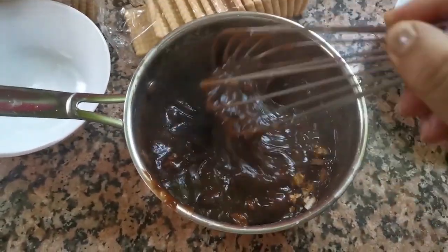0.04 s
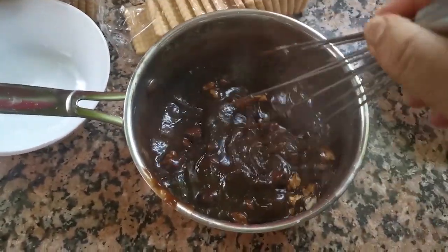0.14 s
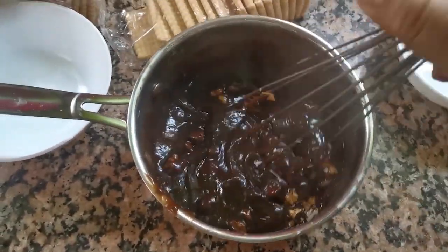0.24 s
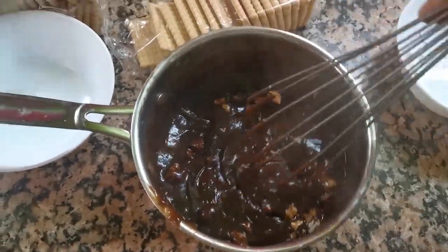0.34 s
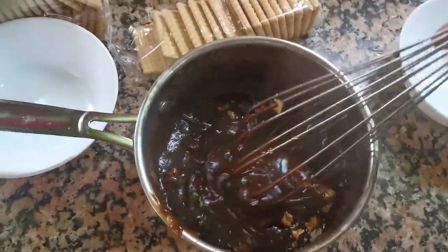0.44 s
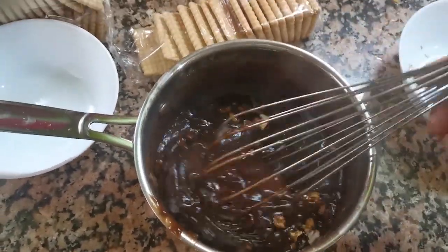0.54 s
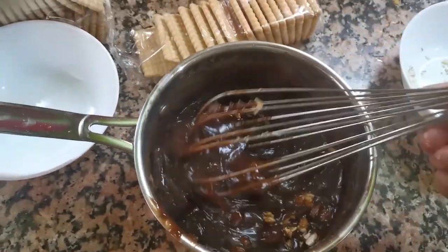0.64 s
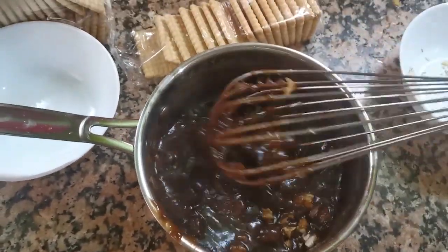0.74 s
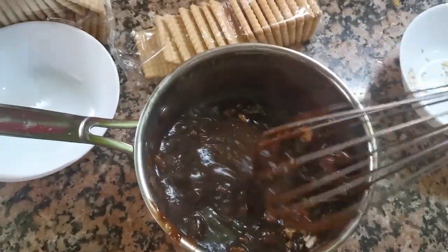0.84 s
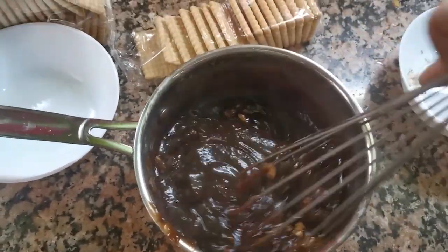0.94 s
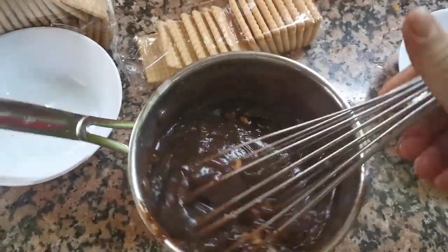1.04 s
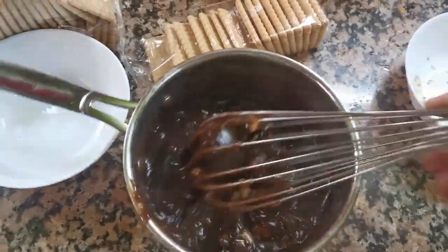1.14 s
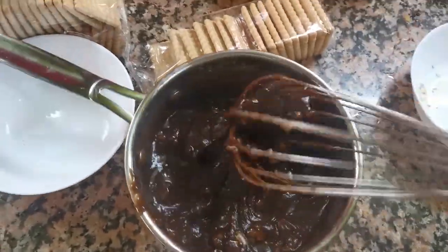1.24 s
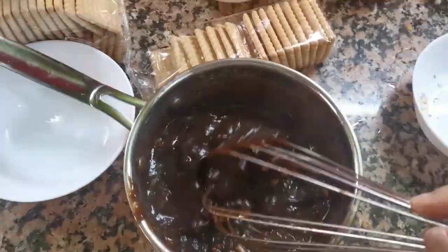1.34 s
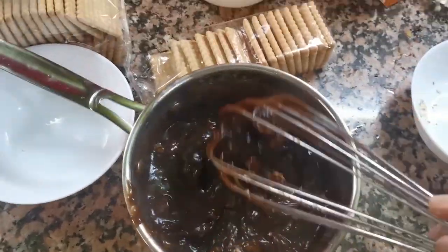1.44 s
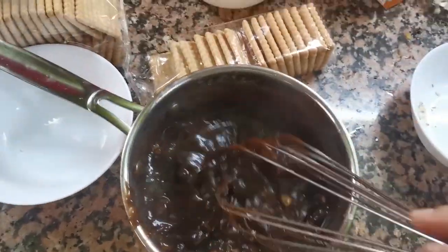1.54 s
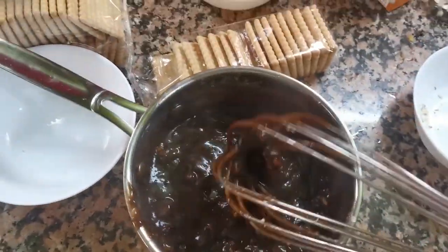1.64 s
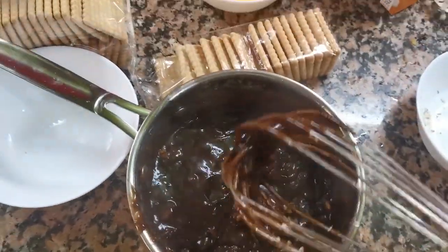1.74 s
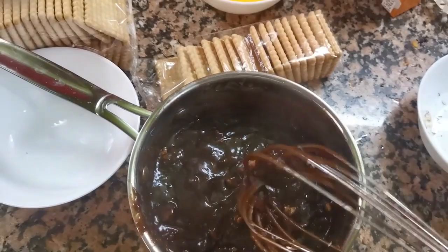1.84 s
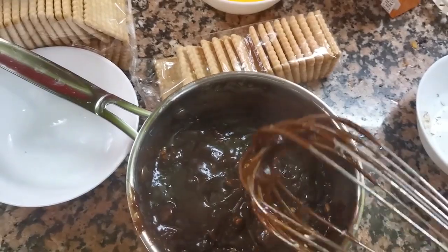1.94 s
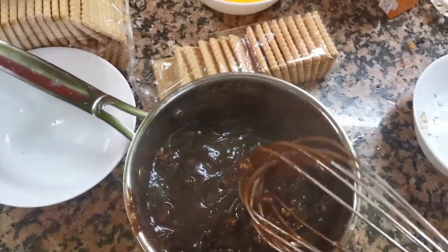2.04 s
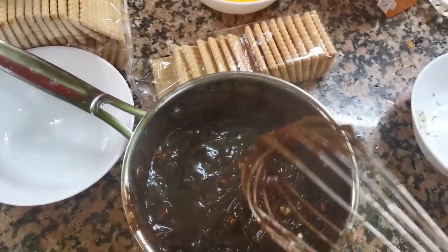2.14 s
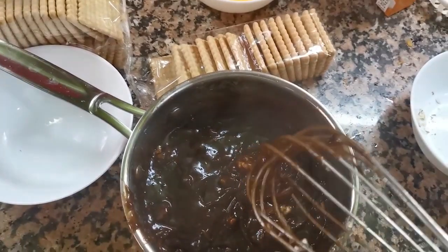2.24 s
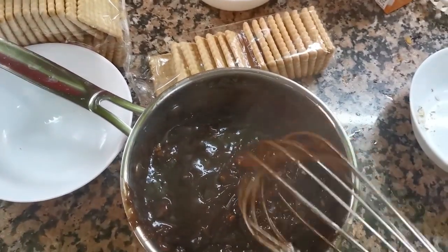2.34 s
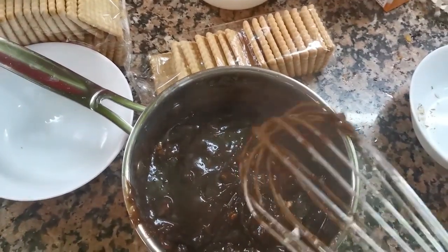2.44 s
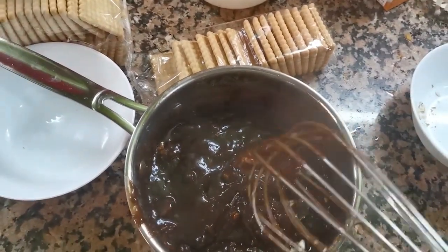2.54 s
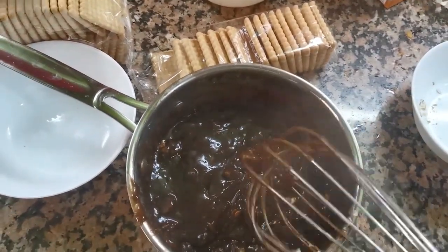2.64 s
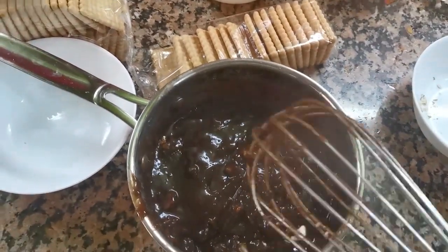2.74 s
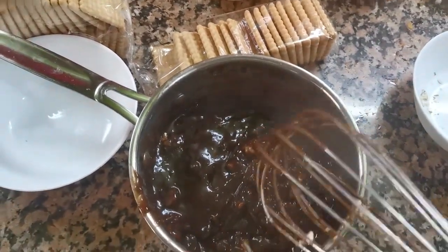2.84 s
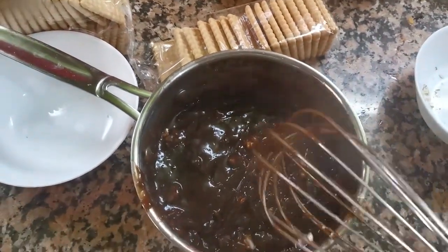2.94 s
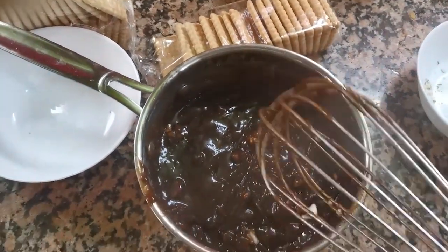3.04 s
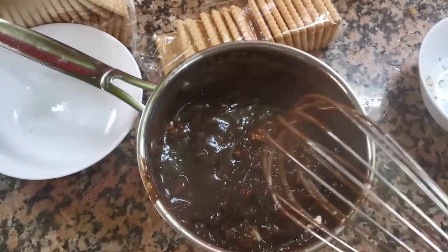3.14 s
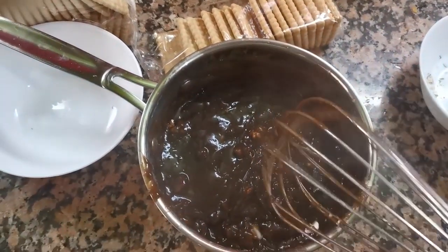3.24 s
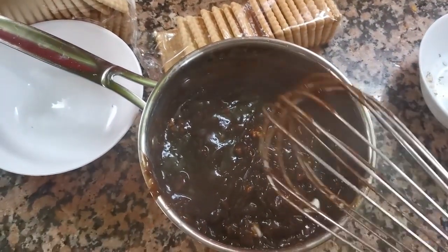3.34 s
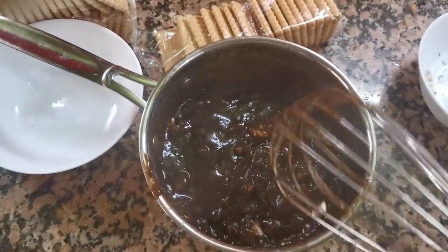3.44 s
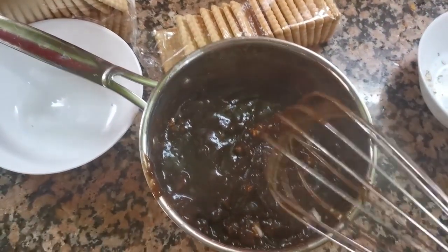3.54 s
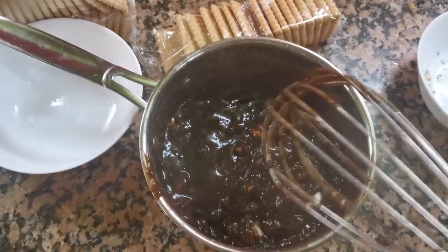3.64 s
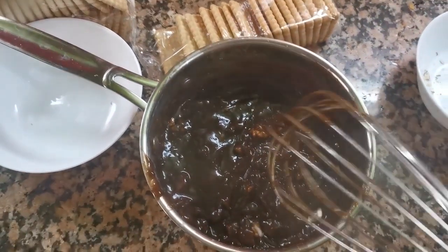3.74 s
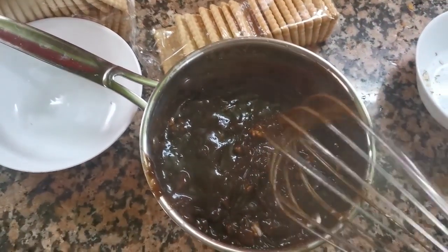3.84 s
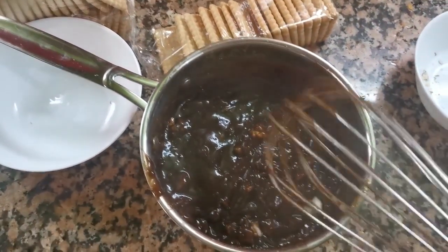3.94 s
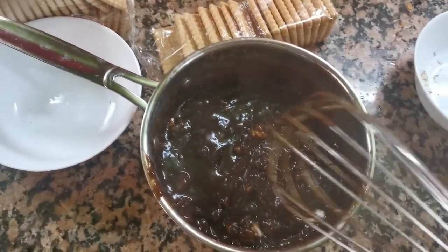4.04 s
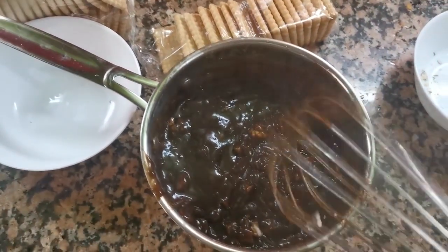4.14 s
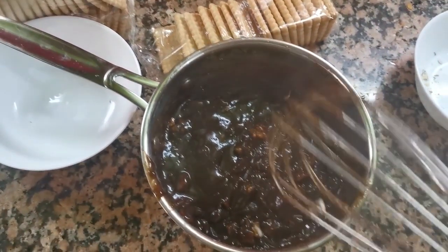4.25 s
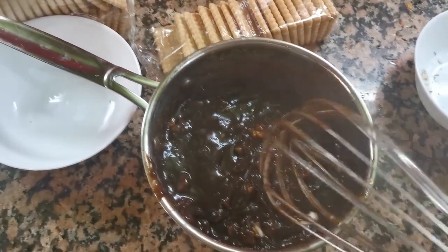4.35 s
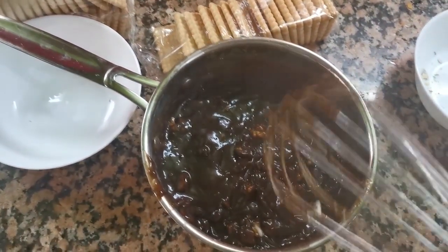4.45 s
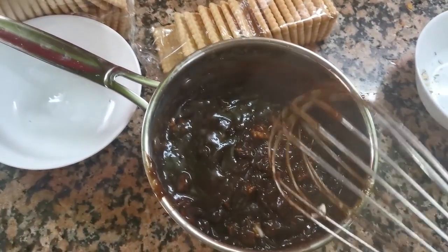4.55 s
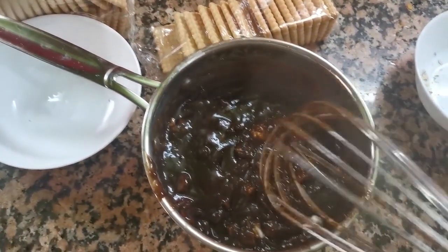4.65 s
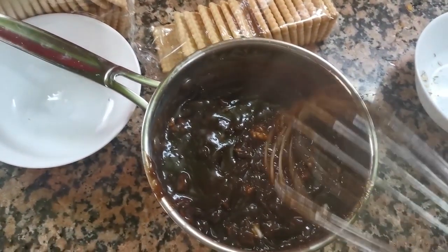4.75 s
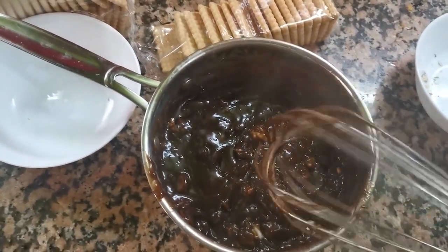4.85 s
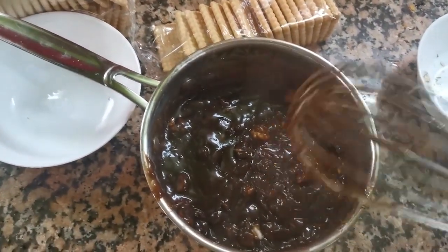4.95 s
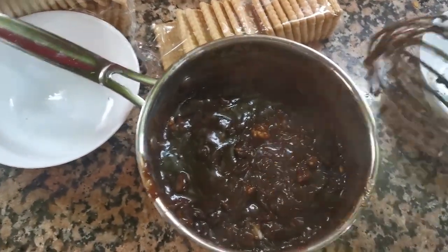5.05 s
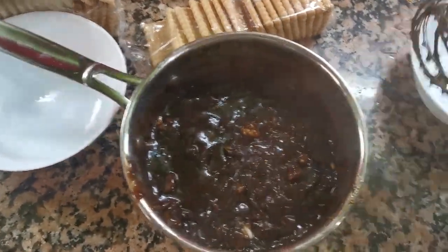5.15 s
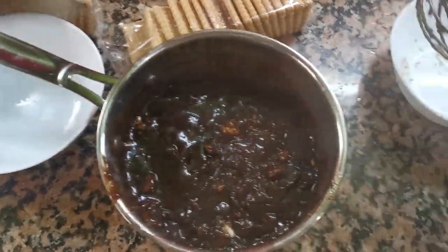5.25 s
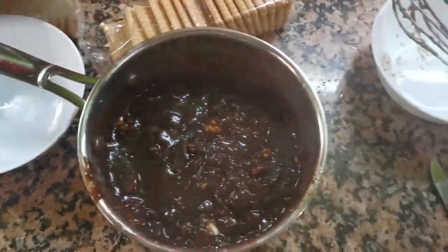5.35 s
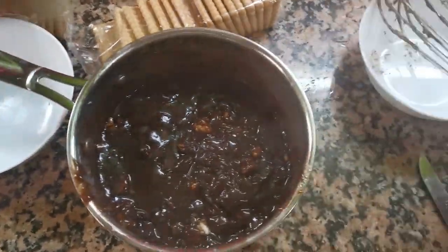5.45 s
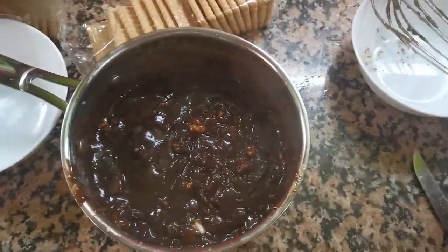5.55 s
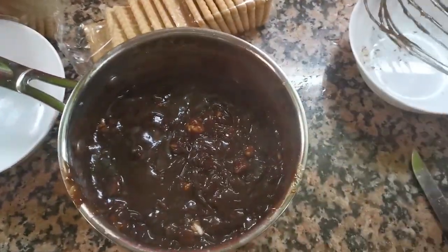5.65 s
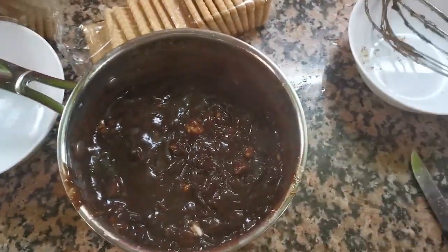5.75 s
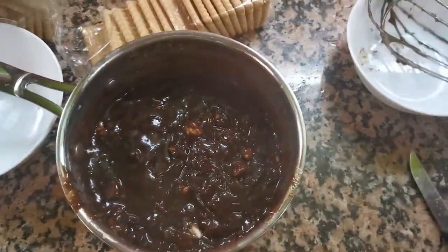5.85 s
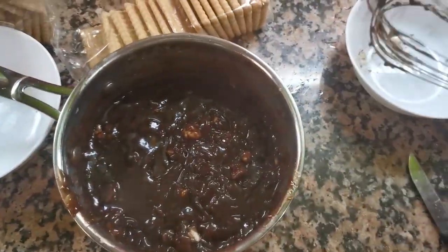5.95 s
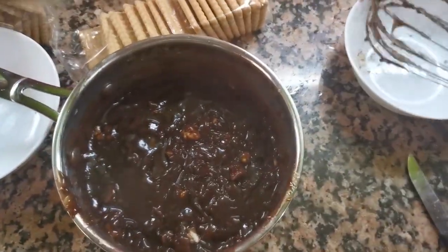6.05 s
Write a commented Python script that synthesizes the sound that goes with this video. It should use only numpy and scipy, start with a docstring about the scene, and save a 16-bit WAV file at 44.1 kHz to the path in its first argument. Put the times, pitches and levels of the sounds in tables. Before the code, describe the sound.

Close up in a small, lively kitchen, a wire whisk stirs thick, crackly mixture in a steel saucepan, with knocks and a brief squeaky scrape. Then twenty even, quick raps on the rim give bright wiry clacks over a dull pan thud. After a short pause the whisk clinks into a china bowl. Low room air and appliance hum lie underneath.

```python
"""A wire whisk loaded with chocolate mixture is rapped twenty times on a steel saucepan's rim: modal ringing and noise.
Before that it stirs the thick mixture and now and then knocks the wall: shaped noise, pops, gliding squeaks and modes.
At the end it is laid clinking into a china bowl, as two sets of damped modes and a buzz.
The small kitchen answers with decaying noise echoes; an appliance hums, in wavering sines, under noisy room air."""
import sys
import numpy as np
from scipy import signal
from scipy.fft import rfft, irfft, next_fast_len
from scipy.io import wavfile
from scipy.ndimage import map_coordinates

SR = 44100
rng = np.random.default_rng(int(sys.argv[2]) if len(sys.argv) > 2 else 0)


def file_out(sig):
    """Save sig as 16-bit WAV at sys.argv[1]."""
    # one column per channel
    cols = np.atleast_2d(sig).T
    # limit, then scale
    lim = np.clip(cols, -1, 1)
    pcm = np.round(lim * 32767).astype(np.int16)
    wavfile.write(sys.argv[1], SR, pcm)


N = 269451

# Modes of the pan struck from inside, low on its wall.
# Each row: frequency in Hz, relative level in dB, decay time t60 in s.
INSIDE_MODES = [(853, -12, 0.15), (1183, -8, 0.044), (1560, -7.5, .025), (1733, -3, 0.025),
                (2120, -12.5, .02), (2560, -5.5, 0.027), (3026, 4, 0.016), (3090, 0.5, 0.021),
                (3240, -5.5, 0.055), (3960, -6, .02), (4340, -7, .025), (4735, 1, 0.037), (5000, 1, 0.034),
                (5235, 6, 0.017), (5940, 0.5, 0.029)]
RIM_PAN_DB, STIR_PAN_DB, BOWL_PAN_DB = 0.5, 2, 1  # left minus right at each place
DRAG_START_S, DRAG_END_S = .3, .56  # one stroke drags along the wall


def amp(db):
    """Level is logarithmic: decibels to amplitude gain."""
    return 10 ** (np.asarray(db) / 20)


def unit(x):
    """Mean power normalisation: scale to rms 1."""
    return x / np.sqrt(np.mean(x ** 2) + 1e-20)


def unit_attack(x):
    """Onset power normalisation: scale a blow so that its first 30 ms have rms 1."""
    onset = x[..., :round(.03 * SR)]
    return x / np.sqrt(np.mean(onset ** 2) + 1e-20)


def along(points, hz, axis=1):
    """Logarithmic frequency scale: read one column of (Hz, ..) points by interpolation."""
    table = np.transpose(points)
    return np.interp(np.log(hz + 1), np.log(table[0] + 1), table[axis])


def curves(rows):
    """Linear interpolation in time: one value per sample for each column after the time."""
    s, *cols = np.transpose(rows)
    return [np.interp(np.arange(N) / SR, s, c) for c in cols]


def wobble(rate):
    """Band-limited fluctuation: a smooth random curve through rate knots a second."""
    knots = rng.standard_normal(int(N * rate / SR) + 4)
    return map_coordinates(knots, [np.arange(N) * rate / SR])


def filtered(x, response):
    """Linear filtering: multiply the spectrum of x by a response of frequency."""
    n = x.shape[-1]
    m = next_fast_len(n + SR // 10)
    spectrum = rfft(x, m) * response(np.fft.rfftfreq(m, 1 / SR))
    return irfft(spectrum, m)[..., :n]


def coloured(x, spectrum):
    """Spectral shaping: x filtered by a (Hz, dB) curve, at rms 1."""
    return unit(filtered(x, lambda hz: amp(along(spectrum, hz))))


def diffuse(pair):
    """Diffuse-field coherence: two unrelated signals become ears alike in the bass, apart in the treble."""
    # Likeness of left and right. Each row: frequency in Hz, correlation from 0 to 1.
    likeness = [(100, 0.95), (500, 0.95), (1200, 0.93), (2500, 0.6), (7000, 0.072)]

    def mid_side_gains(hz):
        turn = np.arccos(np.clip(along(likeness, hz), -1, 1)) / 2
        return np.array([np.cos(turn), np.sin(turn)])

    mid, side = filtered(pair, mid_side_gains)
    return np.array([mid + side, mid - side])


def add(track, s, sound):
    """Superposition: mix a sound into the track at time s."""
    part = track[:, max(round(s * SR), 0):][:, :sound.shape[-1]]
    part += sound[..., :part.shape[-1]]


def ring(modes, t, scatter_db, detune, spread):
    """Modal synthesis: decaying sines with new strengths, tuning and phase between the ears for each blow."""
    hz, db, t60 = np.transpose(modes)[:, :, None]
    size, shift, lag, start = rng.standard_normal((4, len(modes), 1))
    fade = amp(db + scatter_db * size - 60 * t / t60)
    phase = 2 * np.pi * (hz * (1 + detune * shift) * t + start)
    # each mode takes about one cycle to start
    onset = 1 - np.exp(-(t * hz) ** 2)
    return np.array([np.sum(onset * fade * np.sin(phase + ear * spread * lag), 0) for ear in (-1, 1)])


def chatter(t, rebound, rebound_db, cluster_s, rattle_db, rattle_t60, count=40):
    """Impulsive contact force: the loops land one after another, rebound once, and rattle as they die out."""
    force = np.zeros(len(t))
    for s, db in ((0, 0), (rebound, rebound_db)):
        later = np.array([0, 1, 2, 3, 4.5]) * cluster_s * rng.uniform(.75, 1.25, 5)
        landing = (abs(s + later) * SR).astype(int)
        np.add.at(force, landing, amp(db - 2.2 * np.arange(5)))
    late = rng.uniform(0, .05, count)
    rattle = amp(rattle_db - 60 * late / rattle_t60) * rng.standard_normal(count)
    np.add.at(force, (late * SR).astype(int), rattle)
    return force


def driven(force, response):
    """Convolution principle: a body's response to a force."""
    return signal.fftconvolve(np.atleast_2d(response), force[None], axes=1)[:, :len(force)]


def in_kitchen(sound):
    """Reverberation: add the room's diffuse answer, with its own level and decay at each frequency."""
    # Each row: frequency in Hz, reverberation time t60 in s, relative echo level in dB.
    room = [(98, 0.95, -5), (296, 0.25, 3), (530, 0.44, -1), (1200, 0.54, 0), (3000, 0.68, -5.5),
            (6850, 0.44, -1.5), (7870, 0.55, -10.5), (10400, 0.37, -8), (15000, 0.17, -5.5)]
    noise = diffuse(rng.standard_normal((2, SR * 2 // 3)))
    hz, t, z = signal.stft(noise, SR, nperseg=256)
    t60 = along(room, hz)[:, None]
    gain = amp(along(room, hz, axis=2))[:, None]
    # a longer decay starts lower, so that its energy does not grow with t60
    level = gain * np.sqrt(np.log(10 ** 6) / (t60 * SR))
    build_up = 1 - np.exp(-t / .006)
    shape = level * amp(-60 * t / t60) * build_up
    response = signal.istft(z * shape, SR, nperseg=256)[1]
    echo = signal.fftconvolve(sound, response, axes=1)
    add(echo, 0, sound)
    return echo


def panned(sound, db):
    """Interaural level difference: place a sound by left minus right in dB."""
    return sound * amp([[db / 2], [-db / 2]])


# pan wall, dead knock and counter boom, relative to the wires; then what a whisk full of mixture adds to each
RIM_WALL_DB, RIM_KNOCK_DB, RIM_BOOM_DB = -19, -20, -22
LOAD_WALL_DB, LOAD_KNOCK_DB, LOAD_BOOM_DB = 3, 4, 2.5
SHED_S = .8  # time from the first rap until the load is down to 1/e
REBOUND_S, REBOUND_SCATTER = 0.01, .15  # typical flight of the loops; its logarithmic spread from rap to rap
RIM_CLATTER_DB = -11  # dense higher pan modes, relative to the clang
# low wall modes while the loaded whisk lands partly inside the rim; their loss once it is light
LOW_HIT_DB, LOW_HIT_FADE_DB = 2, 25.5


def taps():
    """Impact with falling mass: raps on the rim lose pan wall, knock and boom as the mixture drops off."""
    # Each row: start in seconds, strength in dB, brightness (0.7 dB per kHz each), rebound in dB.
    raps = [(1.8202, -28, 3, -8.5), (1.9903, -29, -6.5, -14), (2.1451, -31, -2.5, -4),
            (2.3065, -30, -4, -14.5), (2.4631, -29, -7.5, -10.5), (2.6152, -31.5, -7.5, -4),
            (2.7656, -31, -9, -6), (2.9167, -30, -4.5, -3.5), (3.077, -30, -2, -7),
            (3.2295, -30.5, -1.5, -11), (3.3822, -29.5, -1.5, 2.5), (3.543, -30, -3, -4.5),
            (3.7037, -31, -4.5, -9), (3.8629, -31.5, -4, -1.5), (4.0167, -33, -4, -13),
            (4.1718, -33, -7, 1.5), (4.3356, -30, -4.5, -11.5), (4.4925, -31, -3, -6),
            (4.6364, -32.5, -4, -4), (4.792, -32.5, -2.5, -2.5)]
    # Wall of the filled pan. Each row: frequency in Hz, relative level in dB, decay time t60 in s.
    wall_modes = [(2035, -35, .025), (2529, 2.5, 0.027), (2760, 3.5, 0.018), (2977, -4.5, 0.022),
                  (3460, -12.5, 0.019), (3770, 2.5, 0.014), (4050, -7, 0.051), (4350, 3.5, 0.01),
                  (5100, -15.5, 0.067)]
    # Dead knock. Each row: frequency in Hz, relative density in dB per Hz.
    knock_spectrum = [(20, -15.5), (45, -2.5), (120, -0.5), (195, 0), (280, 3.5), (550, -0.5), (800, 1),
                      (1200, -4.5), (1750, -3), (2300, -7.5), (4000, -26.5)]
    out = np.zeros((2, N))
    for s, db, bright, rebound_db in raps:
        load = np.exp(-((s - raps[0][0]) / SHED_S) ** 4)
        wall_db = db + RIM_WALL_DB + LOAD_WALL_DB * load
        knock_db = db + RIM_KNOCK_DB + LOAD_KNOCK_DB * load
        low_db = LOW_HIT_DB - LOW_HIT_FADE_DB * (1 - load)
        modes = wall_modes + [(hz, level + low_db, t60) for hz, level, t60 in INSIDE_MODES]
        rebound_s = REBOUND_S * np.exp(REBOUND_SCATTER * rng.uniform(-1.3, 1))
        blow = strike(db, wall_db, knock_db, bright, rebound_s, rebound_db,
                      modes, RIM_CLATTER_DB, knock_spectrum)
        add(out, s, in_kitchen(panned(blow, RIM_PAN_DB)))
        add(out, s, boom(db + RIM_BOOM_DB + LOAD_BOOM_DB * load))
    return out


def strike(wire_db, wall_db, knock_db, bright, rebound_s, rebound_db, wall_modes, clatter_db, knock_spectrum):
    """Forced modal response: one chattering force excites wires and wall; the full pan gives a dead knock."""
    # Wire loops damped by the mixture. Each row: frequency in Hz, relative level in dB, decay time t60 in s.
    wire_modes = [(6020, -17.5, 0.026), (6100, -23.5, 0.013), (6560, -20, 0.02), (6840, -12.5, 0.017),
                  (7390, 0, 0.013), (7445, 0, 0.012), (7763, 0.5, 0.025), (7930, -5.5, 0.02),
                  (8600, -11.5, .01), (9090, -10, .01), (9900, -13.5, 0.0086)]
    # Crack of the contacts. Each row: frequency in Hz, relative density in dB per Hz.
    crack_spectrum = [(1500, -36.5), (5000, -3.5), (7500, 13), (9400, 4), (10800, -16), (14500, -20.5),
                      (16000, -39.5)]
    # The pan's many short-lived higher modes. Each row: frequency in Hz, relative density in dB per Hz.
    clatter_spectrum = [(900, -25), (1700, -7.5), (2300, -17), (3000, 8.5), (3500, 0.5), (4500, 5.5),
                        (5600, -5), (7000, -19), (12000, -50.5)]
    t = np.arange(SR // 7) / SR
    force = chatter(t, rebound_s, rebound_db, cluster_s=.0012, rattle_db=-14.5, rattle_t60=0.22)
    # a harder contact favours the higher wire modes
    loops = [(hz, db + 0.7 * bright * (hz - 7400) / 1000, t60) for hz, db, t60 in wire_modes]
    wires = unit_attack(driven(force, ring(loops, t, scatter_db=1.5, detune=.006, spread=0.51)))
    # each contact also makes a brief broad crack
    contact = np.sqrt(abs(driven(force ** 2, amp(-120 * t / 0.03))))
    crack_noise = coloured(diffuse(rng.standard_normal((2, len(t)))), crack_spectrum)
    crack = unit_attack(contact * crack_noise)
    clang = unit_attack(driven(force, ring(wall_modes, t, scatter_db=3, detune=0.0063, spread=0.64)))
    clatter_noise = coloured(diffuse(rng.standard_normal((2, len(t)))), clatter_spectrum)
    clatter = unit_attack(clatter_noise * amp(-60 * t / 0.066))
    wall = unit_attack(clang + amp(clatter_db) * clatter)
    knock_noise = coloured(diffuse(rng.standard_normal((2, len(t)))), knock_spectrum)
    knock = unit_attack(knock_noise * amp(-60 * t / 0.18))
    return amp(wire_db) * (wires + amp(-7.5) * crack) + amp(wall_db) * wall + amp(knock_db) * knock


def boom(db):
    """Structure-borne sound: the pan passes a blow to the counter, whose bass resonances swell only afterwards."""
    # Counter and kitchen resonances. Each row: frequency in Hz, relative level in dB, decay time t60 in s.
    bass_modes = [(91, 0.5, 0.54), (145.5, -2, 0.82), (242.6, -0.5, 0.4), (270.3, 1.5, 0.37),
                  (320.8, -3, .45), (469, -1, 0.46), (521, 5, 0.29), (552, 4, 0.36), (870, -9.5, 0.97)]
    t = np.arange(SR * 2 // 3) / SR
    resonance = ring(bass_modes, t, scatter_db=1.5, detune=.004, spread=.1)
    swell = 1 - np.exp(-(t / 0.023) ** 2)
    return amp(db) * swell * resonance


# wires and bottom knock relative to the wall, with the whisk clear of the mixture
CLEAR_WIRE_DB, CLEAR_KNOCK_DB = 11, -8.5
# their change at depth 1, and the brightness there (0.7 dB per kHz each)
DEEP_WIRE_DB, DEEP_KNOCK_DB, DEEP_BRIGHT = -13.5, 13, -20
STIR_BOOM_DB, STIR_REBOUND_S = -25.5, 0.0081  # counter boom relative to the wall; flight before the rebound
STIR_CLATTER_DB = -10  # dense higher pan modes, relative to the clang


def stir_knocks():
    """Viscous damping: the deeper the whisk hits the pan, the duller the wires and the stronger the bottom's knock."""
    # Each row: start in seconds, wall strength in dB, depth in the mixture from 0 to 1, rebound in dB.
    knocks = [(0.0608, -37.5, 0.54, 3), (0.5068, -55, 0.11, -26), (0.8438, -41, 0.21, -11),
              (0.9913, -56.5, 0.97, -22), (1.2222, -72, 0.3, -12.5), (1.4983, -65.5, 1, -18.5),
              (1.553, -49, 0.14, -17)]
    # Knock of the mixture-filled bottom. Each row: frequency in Hz, relative density in dB per Hz.
    bottom_spectrum = [(30, -25), (170, -30.5), (270, 11), (390, -9), (520, 12.5), (720, -3), (1200, 1),
                       (1800, -5.5), (2400, -0.5), (4000, -37)]
    out = np.zeros((2, N))
    for s, db, depth, rebound_db in knocks:
        wire_db = db + CLEAR_WIRE_DB + DEEP_WIRE_DB * depth
        knock_db = db + CLEAR_KNOCK_DB + DEEP_KNOCK_DB * depth
        blow = strike(wire_db, db, knock_db, DEEP_BRIGHT * depth, STIR_REBOUND_S, rebound_db,
                      INSIDE_MODES, STIR_CLATTER_DB, bottom_spectrum)
        add(out, s, in_kitchen(panned(blow, STIR_PAN_DB)))
        add(out, s, boom(db + STIR_BOOM_DB))
    return out


STROKE_FADE_DB_PER_S = 49  # a stroke swells and fades at this rate around its fastest point
RUB_DB = -14.5  # gain of the light rubbing on the steel, relative to the stroke
DRAG_DB, DRAG_SWELL_DB, DRAG_EDGE_S = -52.5, 18, 0.031  # drag gain at its end; growth; time to meet or leave the wall


def stirring(pops_per_s=160):
    """Friction and bursting films: sticky pops and nut pieces crackle; the wires rub the steel and once drag on it."""
    # Each row: time of the fastest point in seconds, stroke gain in dB.
    strokes = [(0, -61), (.42, -63.5), (1.09, -60), (1.74, -65)]
    # Spectra of mixture and of wire on steel. Each row: frequency in Hz, relative density in dB per Hz.
    squelch_spectrum = [(60, -19), (110, -3.5), (300, 4.5), (700, -9.5), (1200, -9.5), (2400, -9.5),
                        (3300, -15), (5000, -19.5), (7600, -14), (9000, -31.5), (14000, -51)]
    scrape_spectrum = [(3000, -36), (5200, -14.5), (5900, -13.5), (6600, -13), (7600, 10), (8500, -9.5),
                       (9600, -13.5), (11000, -15), (14500, -27), (16000, -45.5)]
    t = np.arange(N) / SR
    effort = sum(amp(db - STROKE_FADE_DB_PER_S * abs(t - s)) for s, db in strokes)
    pops = (rng.random(N) < pops_per_s / SR) * rng.standard_normal(N)
    smear = diffuse(rng.standard_normal((2, N))) * amp(3.1 * wobble(25))
    squelch = effort * coloured(.5 * unit(pops) + smear, squelch_spectrum)
    edges = np.minimum(t - DRAG_START_S, DRAG_END_S - t) / DRAG_EDGE_S
    touching = np.clip(1 + edges, 0, 1)
    still_to_grow = np.interp(t, [DRAG_START_S, DRAG_END_S], [1, 0])
    drag = touching * amp(DRAG_DB - DRAG_SWELL_DB * still_to_grow)
    # the wires catch and slip hundreds of times a second
    grain = amp(3.5 * wobble(300) + 1.5 * wobble(40))
    rubbing = amp(RUB_DB) * effort + drag
    scrape = rubbing * grain * coloured(rng.standard_normal((2, N)), scrape_spectrum)
    return in_kitchen(squelch + scrape)[:, :N]


SQUEAK_LOW_HZ, SQUEAK_HIGH_HZ, SQUEAK_GLIDE = 5170, 8350, .03  # range of starting pitches; share by which each rises
SQUEAK_S, SQUEAK_DB = .032, -62.5  # length; typical peak gain before panning


def squeaks(count=9):
    """Stick-slip oscillation: short, unsteady rising whistles of the wires, more frequent late in the drag."""
    out, n = np.zeros((2, N)), round(SQUEAK_S * SR)
    for when, pitch in rng.random((count, 2)):
        s = DRAG_START_S + (DRAG_END_S - DRAG_START_S) * np.sqrt(when)
        start_hz = SQUEAK_LOW_HZ * (SQUEAK_HIGH_HZ / SQUEAK_LOW_HZ) ** pitch
        glide = np.linspace(1, 1 + SQUEAK_GLIDE, n)
        hz = start_hz * glide * (1 + 0.015 * wobble(960)[:n])
        level = amp(SQUEAK_DB + 8.3 * wobble(234)[:n]) * np.hanning(n)
        add(out, s, level * np.sin(2 * np.pi * np.cumsum(hz) / SR))
    return in_kitchen(panned(out, STIR_PAN_DB))[:, :N]


def clinks():
    """Coupled impact: the whisk drops into the bowl and rocks, its wires buzzing and the china ringing."""
    # Each row: start in seconds, strength in dB, gain of the bowl ring relative to it in dB.
    touches = [(5.419, -44.5, -28), (5.4793, -60.5, -13.5), (5.62, -65, -15), (5.655, -50, -25),
               (5.8964, -51, -5), (5.91, -51.5, -3.5), (5.9722, -51.5, -7.5), (5.996, -49, -7)]
    # Free whisk, then china bowl. Each row: frequency in Hz, relative level in dB, decay time t60 in s.
    whisk_modes = [(876, -4, 0.086), (972, -13, 0.062), (1090, -9, 0.038), (1848, -5.5, 0.04),
                   (2110, -7.5, 0.027), (3030, -1.5, 0.046), (3220, -15, 0.032), (4640, -9, 0.09),
                   (5200, -6, 0.021), (5850, -16, 0.028), (6630, 6, 0.065), (6680, -4.5, 0.064),
                   (7100, -3, 0.029), (7570, 5.5, 0.036), (8000, -8, 0.043), (8800, -22, .03),
                   (9500, -24, 0.022), (11700, -13.5, 0.067), (12400, -15, .03), (13700, -16, .03)]
    bowl_modes = [(1110, -0.5, 0.28), (1817, 2, 0.29), (1845, -9, .3), (2830, -2, 0.18), (3160, -2, 0.14),
                  (3320, -3, 0.18), (4680, 2.5, 0.17), (4630, 0, 0.27), (5750, -10, .2), (6525, 11, 0.17),
                  (6830, 11, 0.12), (7440, 9, 0.094), (8000, 18, 0.084), (8600, 9.5, .1), (8651, -2, .15),
                  (8820, 1, 0.12), (11100, -5, .15)]
    out, t = np.zeros((2, N)), np.arange(SR // 2) / SR
    for s, db, bowl_db in touches:
        whisk = unit_attack(ring(whisk_modes, t, scatter_db=1.5, detune=.004, spread=.4))
        bowl = ring(bowl_modes, t, scatter_db=2.5, detune=.003, spread=.4)
        force = chatter(t, rebound=.005, rebound_db=-4.5, cluster_s=0.001, rattle_db=-14, rattle_t60=0.11)
        # the buzz is the whisk's ring cut short at each contact
        short_ring = ring(whisk_modes, t, scatter_db=2.0, detune=0.036, spread=0.57) * amp(-60 * t / 0.006)
        buzz = unit_attack(driven(force, short_ring))
        clink = whisk + amp(-0.5) * buzz + amp(bowl_db) * bowl
        add(out, s, in_kitchen(panned(amp(db) * clink, BOWL_PAN_DB)))
    return out


BUMP_S, BUMP_DB = 0.97, -42  # the pan rocks on the counter: start; typical gain


def handling():
    """Free vibration: the pan rocks once in one bass mode; later the whisk handle ticks in the hand."""
    # Handle shifting in the grip. Each row: start in seconds, level in dB.
    shifts = [(5.228, -73), (5.254, -65.5)]
    # Each row: frequency in Hz, relative level in dB, decay time t60 in s.
    handle_modes = [(1075, -6.5, 0.05), (1510, -11.5, 0.024), (2950, -4, .025), (3540, -1, 0.02),
                    (7600, -1, 0.0087)]
    out, t = np.zeros((2, N)), np.arange(SR // 3) / SR
    rock = ring([(98.8, 0, 0.56)], t, scatter_db=2, detune=0, spread=0) * (1 - np.exp(-t / .006))
    add(out, BUMP_S, amp(BUMP_DB) * rock)
    for s, db in shifts:
        tick = unit_attack(ring(handle_modes, t, scatter_db=4.0, detune=0.018, spread=0.37))
        add(out, s, in_kitchen(amp(db) * tick))
    return out


def background():
    """Diffuse noise and tonal hum: kitchen air and the slightly unsteady hum of an appliance."""
    # Each row: time in seconds, level of the air in dB; the hum follows its rises.
    air_level = [(0, -58.5), (1.7, -58.8), (5, -67), (5.8, -67), (6.1, -61.5)]
    # Each row: frequency in Hz, relative density in dB per Hz.
    air_spectrum = [(18, -24), (36, 8), (70, -8), (110, 1.5), (170, -9), (300, -2.5), (450, -10),
                    (800, -13.5), (1500, -17.5), (3200, -22), (5500, -32.5), (7600, -21.5), (9500, -43),
                    (15000, -63.5)]
    # Each row: frequency in Hz, typical peak level in dB while the background is at its quietest.
    hum_tones = [(100, -72.5), (150.5, -78), (290.5, -68), (581, -80), (883, -84)]
    level_db, = curves(air_level)
    t = np.arange(N) / SR
    hum = sum(amp(db + 0.67 * wobble(6.7)) * np.sin(2 * np.pi * hz * t + .5 * wobble(4.6))
              for hz, db in hum_tones)
    air = coloured(diffuse(rng.standard_normal((2, N))), air_spectrum)
    return amp(level_db) * air + amp(level_db - np.min(level_db)) * hum


def scene():
    """Superposition of everything that sounds in the kitchen."""
    return taps() + stir_knocks() + stirring() + squeaks() + clinks() + handling() + background()


TOP_HZ = 15800  # half-amplitude point of the band limit


def record(dry):
    """Band limitation: a very steep low-pass removes the highest treble."""
    return filtered(dry, lambda hz: 1 / (1 + (hz / TOP_HZ) ** 120))


dry = scene()
out = record(dry)
file_out(out)
```